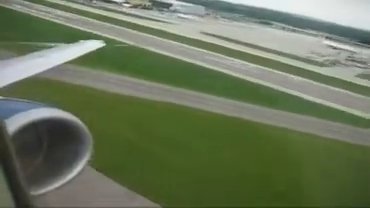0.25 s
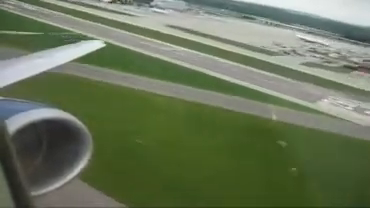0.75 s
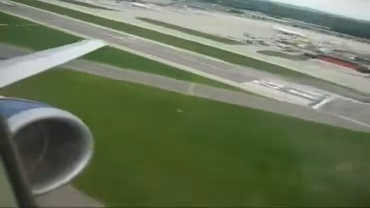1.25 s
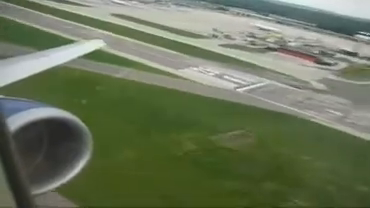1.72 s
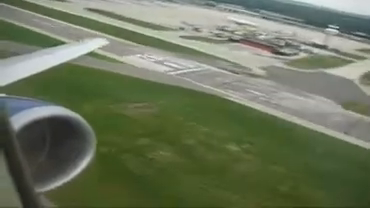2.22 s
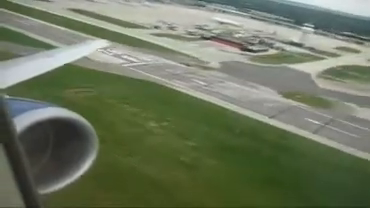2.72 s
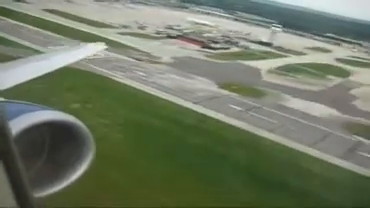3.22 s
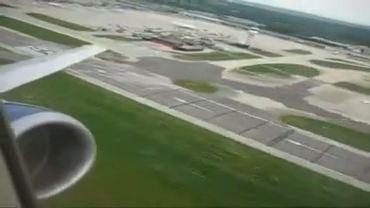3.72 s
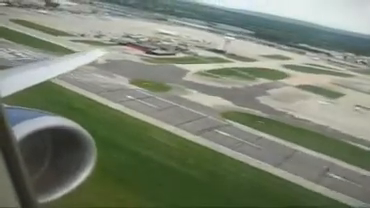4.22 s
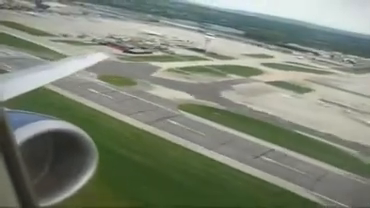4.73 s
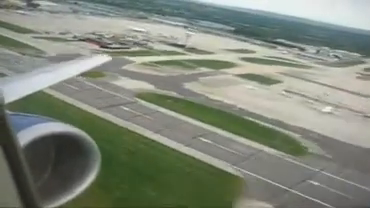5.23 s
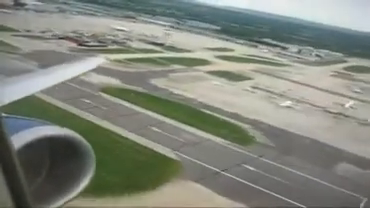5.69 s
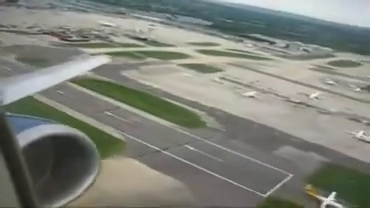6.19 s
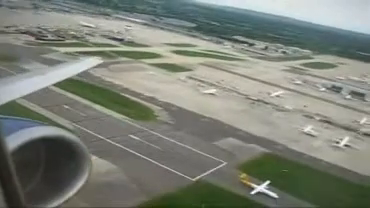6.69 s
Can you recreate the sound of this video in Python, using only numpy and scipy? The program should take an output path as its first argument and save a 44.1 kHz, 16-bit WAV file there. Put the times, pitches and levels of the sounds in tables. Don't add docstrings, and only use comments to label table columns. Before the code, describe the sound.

Jet engines at full power heard from a window seat just after lift-off. A heavy low boom and rumble fills the cabin, quivering with small irregular buffets. Over it sits a steady raspy fan buzz of many stacked tones, with air hissing past the wall and faint high whistles. The small camera microphone sounds coarse, slightly overloaded and dull at the very top.

```python
import sys
import numpy as np
from scipy import signal
from scipy.fft import rfft, irfft, next_fast_len
from scipy.io import wavfile
from scipy.ndimage import uniform_filter1d

SR = 44100
rng = np.random.default_rng(int(sys.argv[2]) if len(sys.argv) > 2 else 0)


def to_wav(sig):
    pcm = np.clip(np.atleast_2d(sig), -1, 1) * 32767
    pcm = np.round(pcm).astype(np.int16)
    wavfile.write(sys.argv[1], SR, pcm.T)


def amplitude_ratio(level_db):
    exponent = np.asarray(level_db, float) / 20
    return 10 ** exponent


N = 306495

# [t/s, level/dB]
ROAR = [(0.0, -38.5), (0.13, -41.5), (0.23, -39), (1.03, -37), (1.37, -39.5), (2.15, -39.5), (2.55, -37),
        (3.1, -38.5), (3.17, -35), (3.58, -40), (3.81, -37.5), (4.47, -39.5), (4.84, -35.5), (4.93, -39.5),
        (6.54, -37.5), (6.95, -34.5)]

# [f/Hz, level/dB]
SHUDDER = [(12, -22), (18, -10), (25, -0.5), (36, 0), (44, -6), (60, -19.5)]
BOOM = [(36, -29.5), (42, -12), (47, -2.5), (51, 0), (57, -4), (64, -8), (70, -16.5), (78, -29.5)]
THRUM = [(54, -24), (61, -3), (66, -1), (72, -4), (80, 0), (88, -2), (96, -22)]
RUMBLE = [(80, -24), (88, -5), (95, 0), (106, -3), (117, 0), (128, -5), (140, -9), (160, -27.5)]
JET = [(125, -22), (147, -7), (165, -0.5), (185, -1), (200, -2), (212, -12), (225, -28)]
DRONE = [(185, -26), (198, -6), (210, 0), (225, -3), (236, -1), (255, -5), (275, -13), (300, -30)]
PANELS = [(235, -22), (260, -1), (280, -1.5), (295, 0), (330, -3), (375, -10), (420, -12.5), (480, -23)]

# [t/s, length/s, centre f/Hz, strength/dB]
SURGES = [(0.0, 0.11, 51.6, 1.5), (0.46, 0.07, 50.7, 2.5), (0.66, 0.4, 317, 0.5), (0.72, 0.17, 109.5, 4.5),
          (0.771, 0.07, 51.5, 2.5), (0.91, 0.17, 164, 2.0), (1.03, 0.27, 28, 4.0), (1.071, 0.27, 230, 2.5),
          (1.13, 0.27, 75.1, 2.0), (1.34, 0.07, 75, 2.0), (1.42, 0.07, 51, 3.5), (1.643, 0.07, 230, 3),
          (1.851, 0.11, 75.2, 5), (1.92, 0.11, 108.7, 2.0), (2.272, 0.11, 230, 3), (2.668, 0.07, 321, 3.5),
          (2.707, 0.17, 110, 6.0), (2.942, 0.11, 28, 5), (3.022, 0.07, 75, 1), (3.13, 0.17, 320, 1),
          (3.28, 0.17, 228.5, 2.0), (3.35, 0.07, 75.4, 2.5), (3.529, 0.17, 51, 3.5),
          (3.849, 0.07, 28, 4.0), (3.921, 0.07, 50.7, 3), (3.932, 0.07, 165, 2.0),
          (4.147, 0.17, 74.9, 2.0), (4.27, 0.11, 51, 1.5), (4.391, 0.11, 110, 5.5), (4.62, 0.064, 28, 3.0),
          (4.82, 0.11, 74.3, 1.5), (4.95, 0.11, 164.4, 2.5), (5.031, 0.27, 51, 3.5),
          (5.46, 0.11, 321, 1.5), (5.56, 0.07, 110.6, 2.5), (5.59, 0.07, 51, 3.5), (5.83, 0.07, 165, 2.0),
          (6.301, 0.11, 164.5, 3.5), (6.4, 0.07, 108.4, 2.5), (6.405, 0.11, 318, 2.5),
          (6.538, 0.11, 75, 5), (6.69, 0.4, 50.9, 1.5), (6.811, 0.11, 28, 5.5), (6.94, 0.07, 230, 3.0),
          (6.95, 0.17, 165.5, 3.5)]
LULLS = [(0.141, 0.17, 75, -2), (0.173, 0.11, 229, -2.0), (0.181, 0.17, 110, -3.0), (0.26, 0.11, 51, -7.0),
         (0.59, 0.07, 51, -2.5), (0.6, 0.07, 165, -1.5), (0.951, 0.07, 51, -3.5), (1.197, 0.07, 75, -1.5),
         (1.35, 0.11, 165, -1.5), (1.571, 0.07, 51, -3.5), (1.63, 0.07, 28, -3.0), (1.726, 0.07, 165, -1.5),
         (1.849, 0.07, 229.5, -4.5), (2.11, 0.11, 163.6, -2.5), (2.141, 0.07, 51, -4.5),
         (2.187, 0.07, 111, -2.0), (2.42, 0.11, 50.8, -1.5), (2.431, 0.07, 28, -2.5),
         (2.509, 0.4, 74.5, -1.5), (3.101, 0.11, 109.8, -3.5), (3.269, 0.078, 51, -3.0),
         (3.543, 0.07, 75, -2.5), (3.549, 0.11, 28, -6.0), (3.639, 0.17, 110, -3.0),
         (3.73, 0.07, 320, -2.5), (4.0, 0.07, 228, -3.5), (4.113, 0.11, 28, -2.5), (4.342, 0.17, 320, -1.5),
         (4.461, 0.07, 51, -3.5), (4.47, 0.07, 28, -3.0), (4.529, 0.11, 75, -6), (4.67, 0.07, 51, -6.5),
         (4.711, 0.27, 28, -5.5), (4.93, 0.4, 109.6, -1.0), (5.223, 0.11, 165.4, -3.0),
         (5.351, 0.4, 320, -2.0), (5.656, 0.17, 28, -8.0), (5.697, 0.07, 319, -2.5),
         (5.921, 0.27, 74.8, -3.5), (5.96, 0.11, 110, -4), (6.03, 0.11, 164.6, -2.5),
         (6.061, 0.17, 50.9, -5.5), (6.32, 0.17, 28, -3.0), (6.36, 0.07, 231, -3), (6.419, 0.11, 229, -4)]
SURGE_OCTAVES, SURGE_DEPTH = 0.25, 1.3
FOLLOW_ROAR = 0.05
LUMP_DB, LUMP_PER_S = 0.5, 7

# [f/Hz, level/dB]
AIRFLOW = [(300, -49.5), (400, -59), (520, -62.5), (680, -70.5), (780, -68), (950, -72.5), (1300, -77),
           (1700, -80.5), (2300, -83), (3000, -83.5), (3600, -84), (4200, -89), (5000, -92.5),
           (5500, -97.5)]
GUST_DB, GUST_PER_S = 0.7, 16

# [t/s, f/Hz]
SHAFT = [(0.0, 79.045), (0.5, 79.055), (0.99, 79.118), (1.49, 79.094), (1.99, 79.113), (2.48, 79.07),
         (2.98, 79.061), (3.48, 79.106), (3.97, 79.122), (4.47, 79.093), (4.96, 79.118), (5.46, 79.134),
         (5.96, 79.125), (6.45, 79.098), (6.95, 79.101)]
# [order, level/dB]
ORDERS_CLEAR = [(5, -42.5), (6, -40), (10, -46), (11, -51.5), (12, -56.5), (15, -55), (16, -60.5),
                (17, -48), (18, -62), (19, -61), (23, -57), (24, -62.5), (25, -56), (27, -62.5), (28, -60),
                (29, -71.5), (32, -67), (34, -60.5), (35, -59.5), (36, -60), (37, -60.5), (38, -56),
                (39, -61.5), (40, -56.5), (41, -67), (43, -55), (46, -71.5), (47, -64.5), (48, -63.5),
                (49, -64.5)]
# [order, level/dB]
ORDERS_FAINT = [(3, -37.5), (4, -38.5), (7, -60.5), (14, -62.5), (22, -66.5), (26, -68), (31, -72.5),
                (42, -71.5), (50, -74.5), (54, -80), (55, -70), (57, -79)]
# [order, level when shut/dB]
SWELLS = [(4, -43), (5, -46), (6, -53), (10, -49), (11, -57.5), (15, -58), (17, -52.5), (23, -62),
          (25, -61), (38, -62), (43, -59.5)]
# [order, from t/s, to t/s, lift/dB]
OPENINGS = [(4, .15, 4.2, 4), (4, .2, 1.4, 3.5), (4, 5.5, 6.95, 5), (11, 2, 6.95, 6), (11, 3.1, 3.4, 1.5),
            (11, .7, 1, 4), (25, .15, 4.2, 3.5), (25, 1.6, 3.45, 1.5), (25, 5.4, 6.95, 2.5),
            (5, 0.2, .9, 5), (5, 1.4, 2.75, 3), (5, 4.5, 6.75, 4.5), (6, 1.25, 6.95, 6), (6, 2, 6.25, 4.5),
            (6, 2.5, 5.85, 3.5), (6, 3, 3.25, 3), (6, 4.5, 4.85, 5.5), (6, 5, 6.95, 2), (10, -0.1, 1.7, 3),
            (10, 0.5, 1.3, 3), (10, 2.5, 4.35, 1.5), (10, 3.5, 3.85, 1.5), (10, 5, 5.65, 2.5),
            (10, 6.4, 6.95, 1.5), (15, 1, 1.15, 6), (15, 2.5, 2.45, 7), (15, 3.5, 3.1, 6.5),
            (15, 4, 4.15, 6), (15, 4.6, 4.85, 4.5), (17, 0.6, 5.05, 2.5), (17, .85, 1.1, 4),
            (17, 3, 3.4, 1.5), (17, 5, 6.95, 2.5), (17, 6.6, 6.85, 2.5), (23, .25, 3.4, 4),
            (23, 0.4, 1.9, 4), (23, 3.15, 3.35, 3), (23, 4.5, 5.15, 6), (23, 5.4, 6.95, 3.5),
            (38, -0.5, .3, 4.5), (38, 1.1, 1.15, 8), (38, 1.5, 3.9, 7), (38, 3, 3.4, 2.5),
            (38, 4.5, 5.42, 6), (43, -0.04, 1.8, 5.5), (43, .5, .65, 2.5), (43, 2.5, 3.45, 3.5),
            (43, 5, 6.25, 3), (43, 6, 6.25, 3), (43, 6.5, 6.95, 8.5)]
OPENING_S = 0.07
WAVER_DB, WAVER_PER_S = 0.78, 7
FOLLOWING = [(28, 6, .5), (34, 43, .5), (35, 43, .5), (36, 38, .4), (37, 38, .6), (39, 43, .9), (46, 43, 1),
             (47, 6, .35), (48, 43, .4)]
FIRM_ORDERS = (4, 6, 10, 11, 17, 23, 25, 36, 37, 38, 40, 43)
FLUTTER_DB, FIRM_FLUTTER_DB = 3.6, 1.6
# [f/Hz, level/dB]
SKIRT = [(2900, -20.0), (2980, -5.0), (3005, 4.5), (3030, -11.0), (3110, -22.5)]

# [f/Hz, level at start/dB, level at end/dB]
COMPRESSOR = [
    (2322, -73, -71),
    (4643.5, -71, -65),
    (4703.5, -80, -67),
]

# [t/s, f/Hz, level/dB]
FAR_FAN = [(0, 3008, -70), (1.3, 3010, -66), (1.7, 3000, -61), (2.1, 3003, -66), (2.65, 2997, -61),
           (2.95, 3008, -66), (3.15, 3013, -58), (3.55, 3015, -59), (4.1, 3009, -63), (4.4, 2994, -62),
           (4.52, 2994, -54.5), (5, 2999, -56), (5.42, 2999, -58), (5.5, 3006, -70), (5.8, 3015, -63),
           (6.45, 3006, -64), (6.95, 2990, -62)]

# [f/Hz, level/dB]
HISS = [(2500, -20), (4000, -3), (5000, 0), (7000, -1), (8000, -1)]
HISS_DB = -57.5
KNEE, CEILING_UP, CEILING_DOWN = 0.28, 0.52, 0.68
HOLD, BITS, TOP_HZ = 4, 8, 7640


def curves(table):
    s, *columns = np.transpose(table)
    return [np.interp(np.arange(N) / SR, s, column) for column in columns]


def noise(shape, lo_hz, hi_hz):
    size = next_fast_len(N)
    hz = np.arange(1, size // 2 + 2) * SR / size
    shape_hz, shape_db = np.transpose(shape)
    colour_db = np.interp(np.log(hz), np.log(shape_hz), shape_db, left=-150, right=-150)
    bins = rfft(rng.standard_normal(size)) * amplitude_ratio(colour_db)
    in_band = bins[(hz > lo_hz) & (hz < hi_hz)]
    rms = np.sqrt(2 * np.sum(np.abs(in_band) ** 2)) / size
    return irfft(bins, size)[:N] / rms


def walk(rate):
    k = int(SR / rate)
    steps = np.repeat(rng.standard_normal(N // k + 1), k)
    wander = uniform_filter1d(uniform_filter1d(steps, k), k)[:N]
    return wander / np.std(wander)


def steady(x, hold_s, share):
    k = int(hold_s * SR)
    power = uniform_filter1d(uniform_filter1d(x ** 2, k), k)
    return x * (np.mean(power) / power) ** (np.clip(share, 0, 1) / 2)


def surge_db(band_hz):
    t = np.arange(0, N, 64) / SR
    s, length, hz, db = np.transpose(SURGES + LULLS)[:, :, None]
    reach = np.exp(-(np.log2(band_hz / hz) / SURGE_OCTAVES) ** 2 / 2)
    moment = np.exp(-((t - s) / length) ** 2)
    return np.repeat(np.sum(db * reach * moment, axis=0), 64)[:N]


def cabin_band(shape, level_db, centre_hz, lo_hz, hi_hz, swell_db, hold_s=0.09, share=0.85):
    db = level_db + FOLLOW_ROAR * swell_db + SURGE_DEPTH * surge_db(centre_hz)
    db += LUMP_DB * walk(LUMP_PER_S)
    return amplitude_ratio(db) * steady(noise(shape, lo_hz, hi_hz), hold_s, share)


def cabin(swell_db):
    shudder = cabin_band(SHUDDER, -31, 28, 18, 40, swell_db, hold_s=0.15, share=0.8)
    boom = cabin_band(BOOM, -21, 51, 40, 62, swell_db, hold_s=0.08)
    thrum = cabin_band(THRUM, -26, 75, 62, 90, swell_db)
    rumble = cabin_band(RUMBLE, -24, 110, 90, 135, swell_db)
    jet = cabin_band(JET, -24, 165, 135, 200, swell_db)
    drone = cabin_band(DRONE, -27, 230, 200, 270, swell_db)
    panels = cabin_band(PANELS, -30.5, 320, 260, 450, swell_db, share=0.8)
    return shudder + boom + thrum + rumble + jet + drone + panels


def airflow(roar_db):
    colour = AIRFLOW + [(SR / HOLD / 2, -97)]
    return amplitude_ratio(roar_db - 2.0 + GUST_DB * walk(GUST_PER_S)) * noise(colour, 500, 2500)


def swells():
    t = np.arange(N) / SR
    level = {round(order): db + WAVER_DB * walk(WAVER_PER_S) for order, db in SWELLS}
    for order, start, end, lift_db in OPENINGS:
        corners = [start - OPENING_S, start, end, end + OPENING_S]
        lift = np.interp(t, corners, [0, lift_db, lift_db, 0])
        level[round(order)] = level[round(order)] + lift
    return level


def fan(swell_db):
    turn = 2 * np.pi * np.cumsum(curves(SHAFT)[0]) / SR
    clear, faint = dict(ORDERS_CLEAR), np.transpose(ORDERS_FAINT)
    swelling = swells()
    swing = {}
    for order, leader, share in FOLLOWING:
        swing[order] = share * (swelling[leader] - np.mean(swelling[leader]))
    quick, slow = np.tanh(walk(18)), np.tanh(walk(3))
    out = np.zeros(N)
    for order in range(3, 58):
        start, *lags = rng.random(4)
        flutter, slip, drift = (np.roll(w, int(lag * N)) for w, lag in zip((quick, quick, slow), lags))
        db = (FIRM_FLUTTER_DB if order in FIRM_ORDERS else FLUTTER_DB) * flutter
        if order in swelling:
            db += swelling[order] + 0.39 * swell_db
        else:
            db += clear.get(order, np.interp(order, *faint)) - 1.56
            db += swing.get(order, 0.9 * swell_db) + 0.03 * order * drift
        phase = order * turn + 2 * np.pi * start + 0.014 * order * slip
        out += np.sqrt(2) * amplitude_ratio(db) * np.sin(phase)
    return out + amplitude_ratio(-65 + swell_db) * noise(SKIRT, 2800, 3200)


def compressor():
    t = np.arange(N) / SR
    out = np.zeros(N)
    for hz, first_db, last_db in COMPRESSOR:
        db = np.linspace(first_db, last_db, N) + 1.7 * walk(3.0)
        out += np.sqrt(2) * amplitude_ratio(db) * np.sin(2 * np.pi * hz * t + 0.6 * walk(6))
    return out


def far_fan():
    hz, db = curves(FAR_FAN)
    phase = 2 * np.pi * np.cumsum(hz) / SR
    return np.sqrt(2) * amplitude_ratio(db + 1.2 * walk(9)) * np.sin(phase + 0.25 * walk(12))


def scene():
    roar_db = curves(ROAR)[0]
    swell_db = roar_db - np.mean(roar_db)
    engines = fan(swell_db) + compressor() + far_fan()
    return (cabin(swell_db) + airflow(roar_db) + engines)[None]


def squeeze_peaks(x):
    room = np.where(x > 0, CEILING_UP, CEILING_DOWN) - KNEE
    over = np.maximum(np.abs(x) - KNEE, 0)
    return x - np.sign(x) * (over - room * np.tanh(over / room))


def hold_samples(x):
    slow = np.convolve(x[::HOLD], [-0.1, 1.2, -0.1], "same")
    steps = 2 ** (BITS - 1)
    return np.repeat(np.floor(slow * steps) / steps, HOLD)[:N]


def low_pass(x):
    return signal.sosfilt(signal.butter(12, 8650, fs=SR, output="sos"), x)


def record(dry):
    held = hold_samples(squeeze_peaks(dry[0]))
    held += amplitude_ratio(HISS_DB) * noise(HISS, 4000, 7600)
    top_cut = signal.ellip(14, 0.3, 75, TOP_HZ, fs=SR, output="sos")
    mix = signal.sosfilt(top_cut, held)[None]
    return low_pass(mix)


dry = scene()
out = record(dry)
to_wav(out)
```